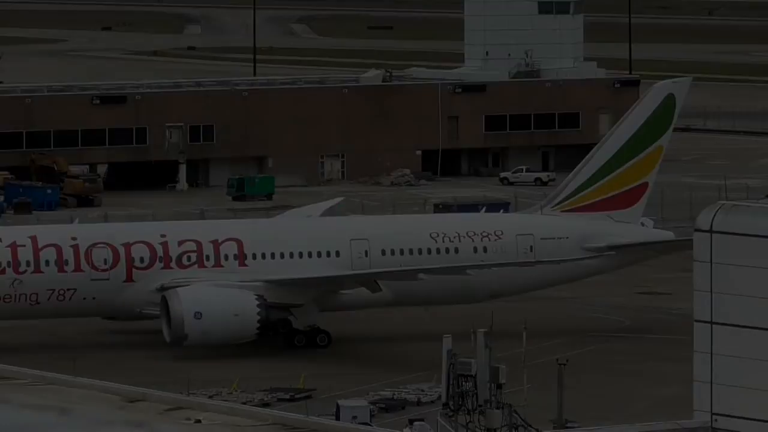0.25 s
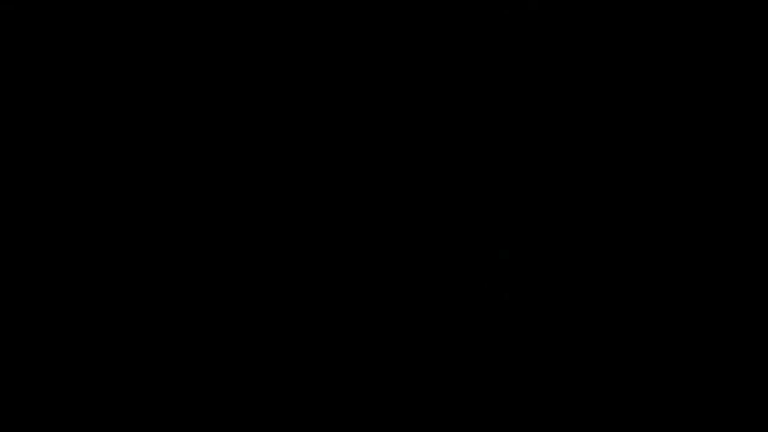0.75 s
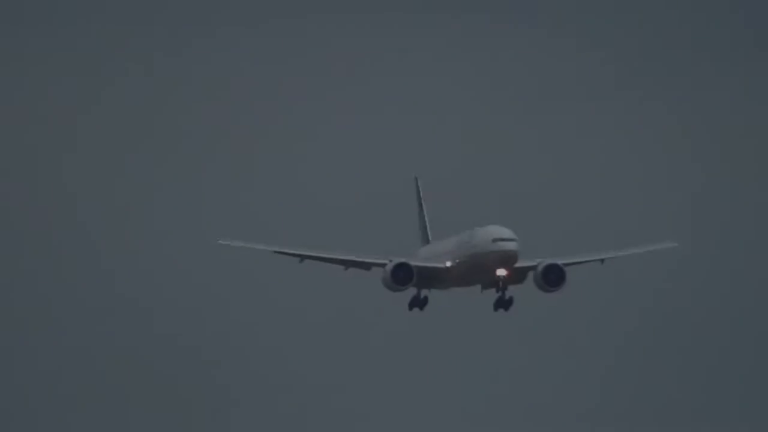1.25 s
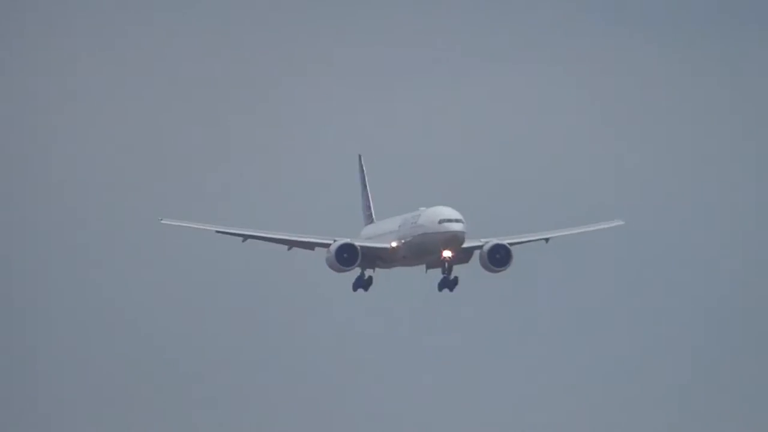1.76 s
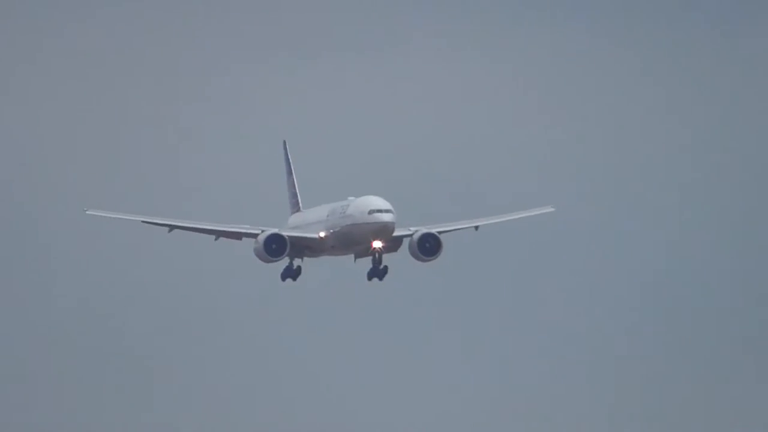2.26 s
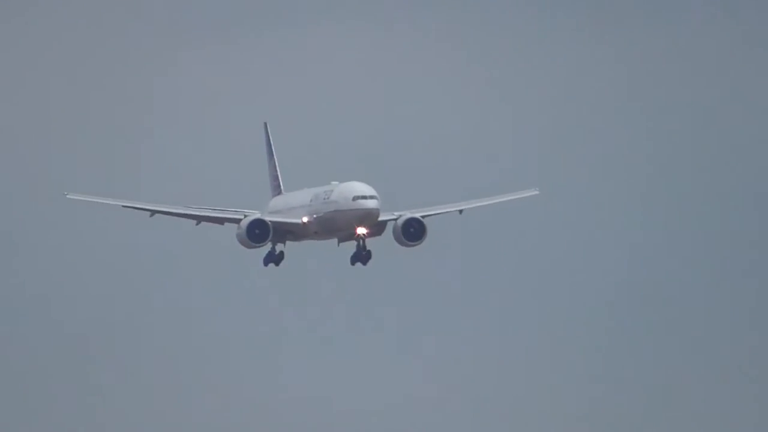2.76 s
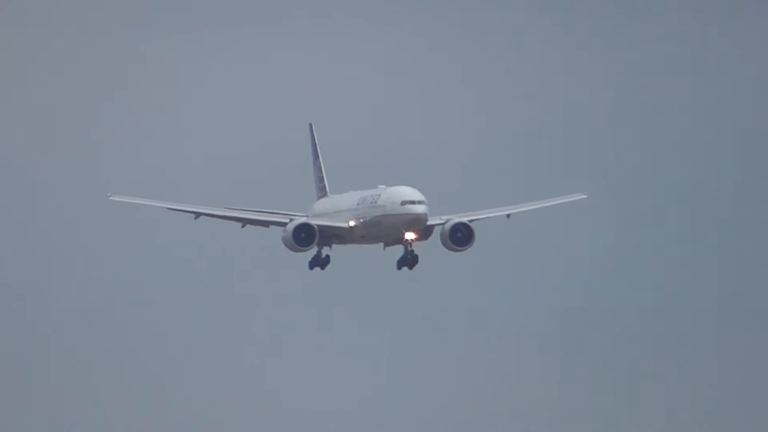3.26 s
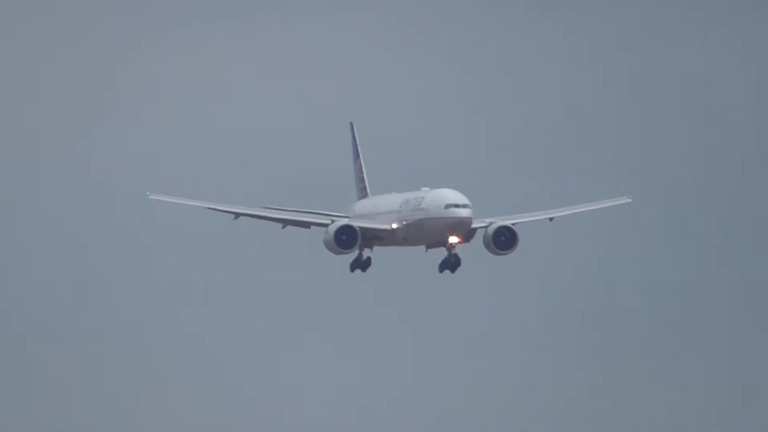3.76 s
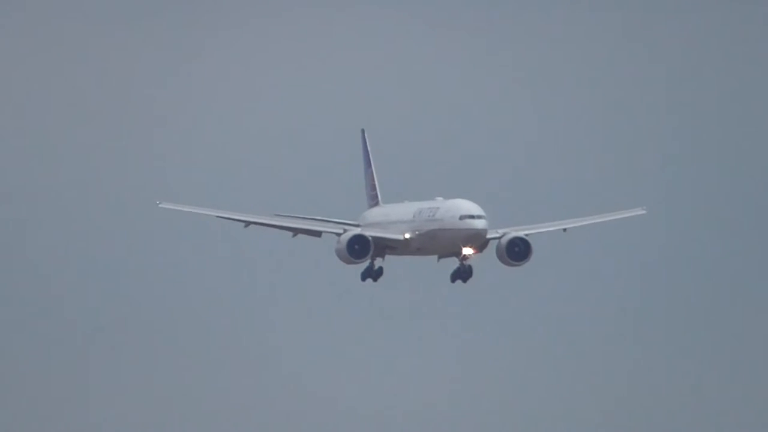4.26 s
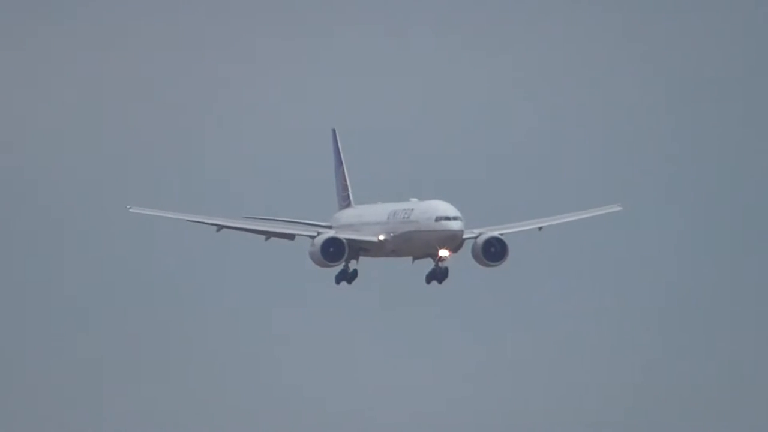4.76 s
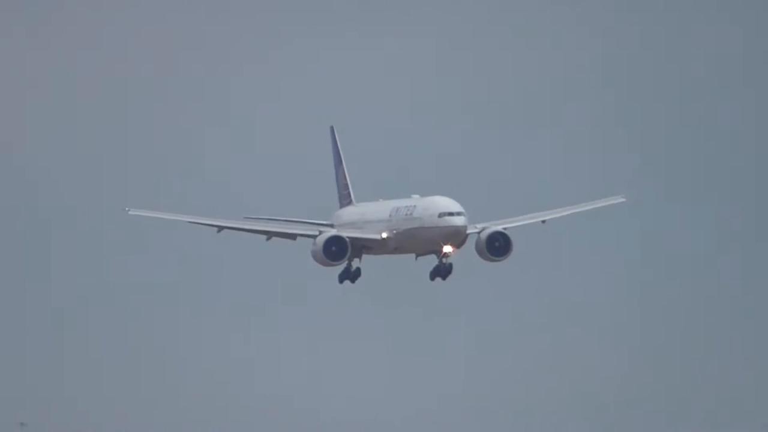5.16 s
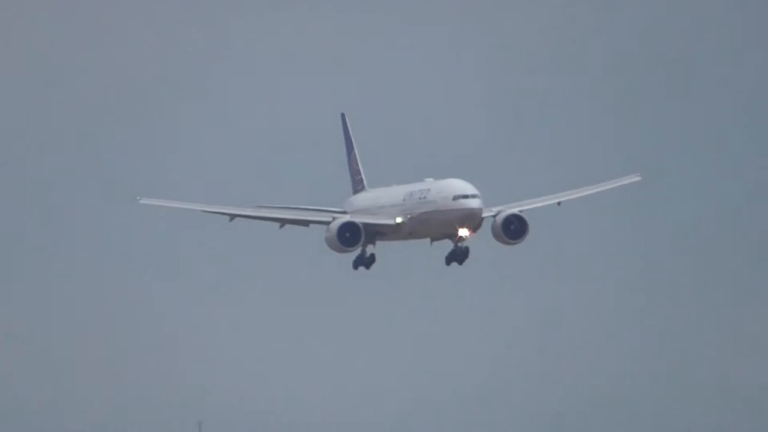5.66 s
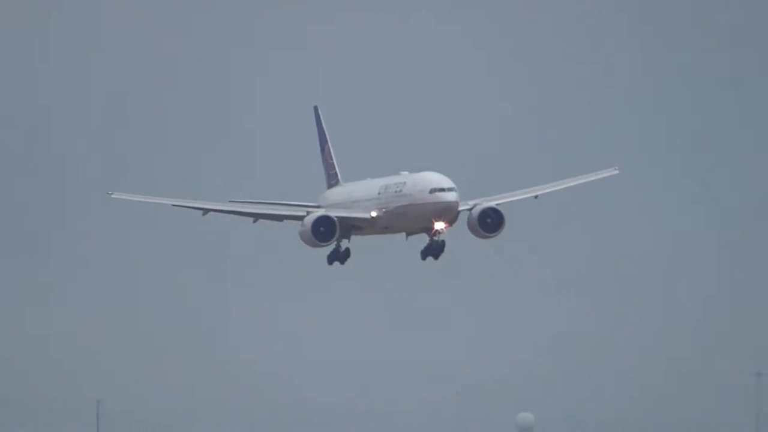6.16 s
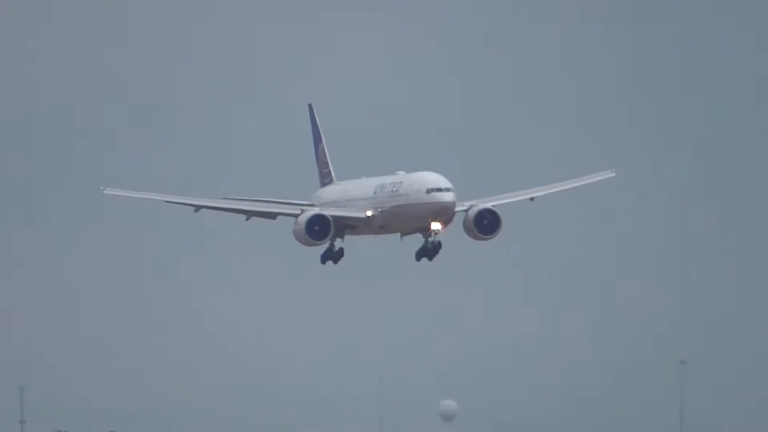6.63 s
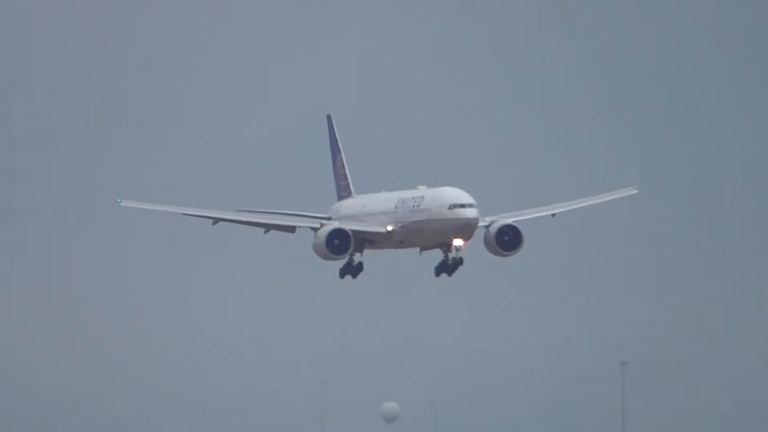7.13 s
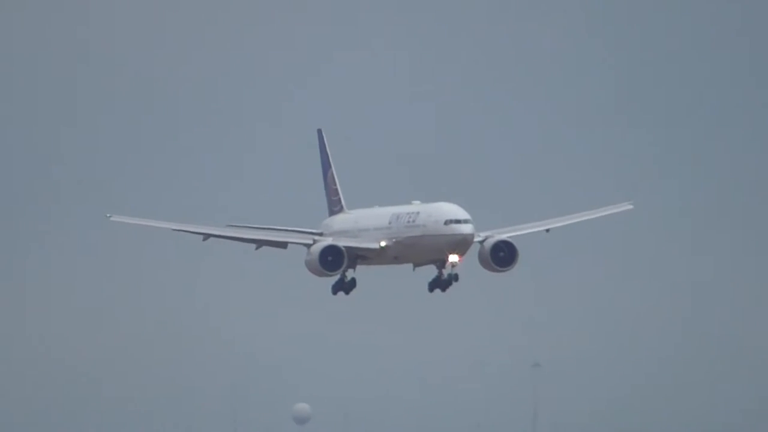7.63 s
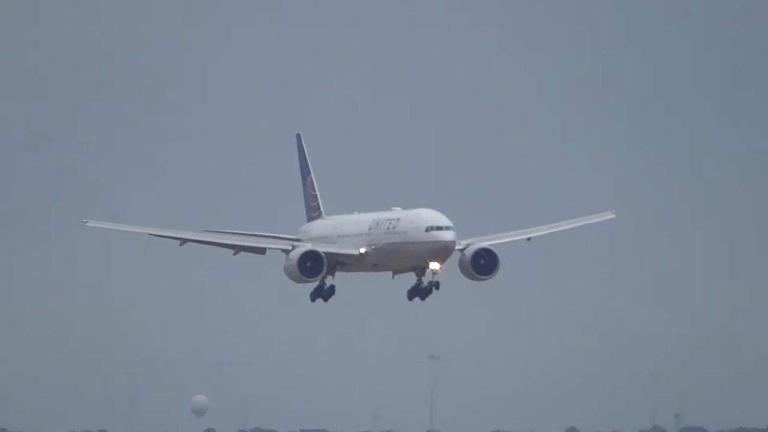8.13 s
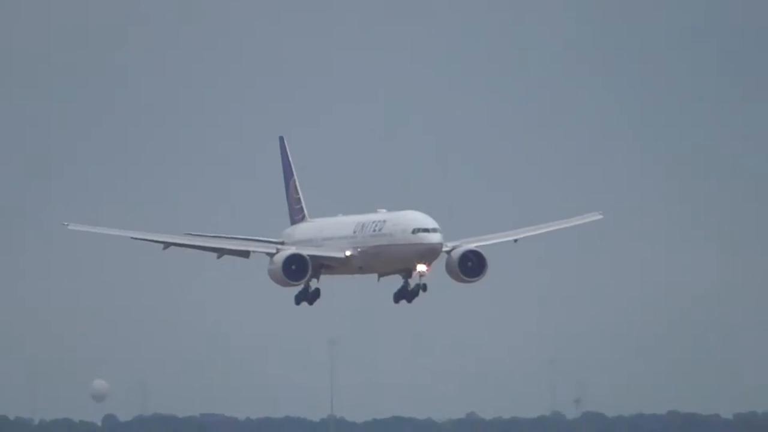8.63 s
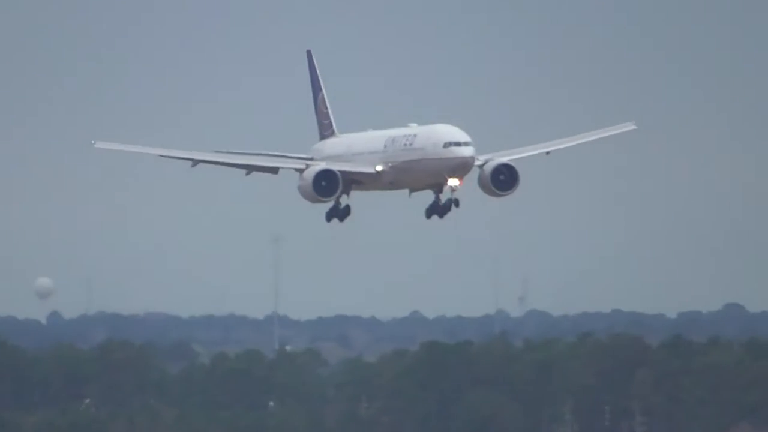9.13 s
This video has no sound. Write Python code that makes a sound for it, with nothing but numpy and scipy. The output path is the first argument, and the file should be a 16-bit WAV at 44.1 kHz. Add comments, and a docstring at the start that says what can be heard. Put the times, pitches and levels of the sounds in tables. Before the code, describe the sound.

At 0 s a faint, dull murmur of distant apron machines is already fading, reaching near silence by about 0.6 s, with one barely audible soft bump. From 0.7 to 1.7 s an approaching airliner fades in smoothly: broad jet roar, deep rolling rumble and soft hiss. A wavering fan drone near 950 Hz flares and dips, strongest around 2 to 4 s, above a hollow hum near 330 Hz. A thin, raspy, insect-like whine near 8.7 kHz holds its pitch, swelling around 2 to 4 s, with faint steady far-off tones. The roar eases slowly. Around 6.5 s the throttles close, the fan tone slides down by over 100 Hz and the hum dies away, while low booms surge until 7.4 s. From 8 s, wind gusts buffet the stereo microphone, with dull thumps near 8.1, 8.5 and 8.9 s and a faint high whistle near the end. The rumble continues to the cut at about 9.4 s.

```python
"""Beside an airport apron, heard through two microphone ports: a distant murmur fades to silence, then
an airliner on final approach fades in. Coloured noise makes its jet and airframe roar, and scattered
tones make its fans, which sink as the throttles close, its booms and a hollow airframe hum.
A thin high whine holds its pitch, faint tones lie far off, and late gusts buffet the microphone."""
import sys
import numpy as np
from scipy import signal
from scipy.fft import rfft, irfft, next_fast_len
from scipy.io import wavfile
from scipy.ndimage import uniform_filter1d

SR = 44100
rng = np.random.default_rng(int(sys.argv[2]) if len(sys.argv) > 2 else 0)


def master(y):
    """Save y as 16-bit WAV."""
    cut = np.clip(np.atleast_2d(y).T, -1, 1)
    pcm = np.round(cut * 32767)  # scale
    wavfile.write(sys.argv[1], SR, pcm.astype(np.int16))


N = 414099
TIME = np.arange(N) / SR  # s
SIZE = next_fast_len(N)
BIN_HZ = np.arange(SIZE // 2 + 1) * SR / SIZE
FREQ = np.maximum(BIN_HZ, 1)  # kept above zero for logarithms


def undb(db):
    """Decibels to gain."""
    return 10 ** (np.asarray(db) / 20)


def unit(x):
    """Scale to rms 1."""
    return x / np.sqrt(np.mean(np.abs(x) ** 2))


def curves(table):
    """Each column of a (s, ..) table at every sample."""
    s, *columns = np.transpose(table)
    return [np.interp(TIME, s, c) for c in columns]


def over_hz(table):
    """Each column of a (Hz, ..) table at every frequency, straight over log frequency."""
    hz, *columns = np.transpose(table)
    return [np.interp(np.log(FREQ), np.log(hz), c) for c in columns]


def colour_gain(colour):
    """Gain of a (Hz, dB) colour, falling steeply past its last point."""
    return undb(over_hz(colour)[0]) * np.minimum(colour[-1][0] / FREQ, 1) ** 2


def swells(table):
    """Bell-shaped changes of level from (peak s, half-length s, dB, ..) rows, one curve per dB column."""
    return sum(np.outer(dbs, np.exp(-((TIME - s) / half_s) ** 2)) for s, half_s, *dbs in table)


def walk(rate_hz):
    """Smooth random wander of spread 1: noise with its quicker changes removed."""
    smoothing = np.exp(-(BIN_HZ / rate_hz) ** 2)
    return unit(irfft(rfft(rng.standard_normal(SIZE)) * smoothing)[:N])


def pair(x, pan_db):
    """Place a sound between left and right, the left port louder by pan_db."""
    return x * undb(np.array([[pan_db], [-pan_db]]) / 2)


# How the two microphone ports hear turbulence.
# Each row: frequency in Hz, likeness from 0 to 1, lead of the left port in rad, left minus right in dB.
PORTS = [(60, 0.68, .05, -4.5), (130, 0.89, 0.22, -2.5), (290, 0.76, 0.21, -0.5), (680, 0.7, 0.46, 2.5),
         (1410, 0.41, 0.54, 2.5), (2500, 0.12, 1.1, -0.5), (3200, 0.2, 3.7, -2), (4400, 0.6, 4.4, -4),
         (6600, 0.6, 4.63, -5.5), (8100, 0.25, 11.2, -2), (15000, 1, 9.6, 0)]


def air_noise(colour, band_hz=(20, 16000)):
    """Turbulence noise, partly shared by the ports; their mean has rms 1 inside the band."""
    alike, lead, pan_db = over_hz(PORTS)
    alike = np.clip(alike, 0, 1)
    shared, *own = rfft(rng.standard_normal((3, SIZE)))
    turn = np.array([np.exp(1j * lead), np.ones(len(lead))])
    ports = np.sqrt(alike) * shared * turn + np.sqrt(1 - alike) * np.array(own)
    ports = ports * colour_gain(colour) * undb(np.array([[1], [-1]]) / 2 * pan_db)
    inside = irfft(ports.mean(axis=0) * (FREQ > band_hz[0]) * (FREQ < band_hz[1]))
    return irfft(ports)[:, :N] / inside.std()


def scatter(width_hz, steady):
    """Wandering strength and phase that spread a tone over a width; a steady tone fades less."""
    offset_hz = ((np.arange(SIZE) + SIZE // 2) % SIZE - SIZE // 2) * SR / SIZE
    chance = rng.standard_normal(SIZE) + 1j * rng.standard_normal(SIZE)
    z = np.fft.ifft(chance / (1 + 2 * (offset_hz / width_hz) ** 2))[:N]
    strength = np.sqrt(uniform_filter1d(np.abs(z) ** 2, int(SR / width_hz)))
    return unit(z / strength ** np.clip(steady, 0, 1))


def tone(hz, width_hz, alike, lead, steady=0):
    """A scattered tone at both ports, about rms 1; the left one leads by a phase angle in rad."""
    alike = np.clip(alike, 0, 1)
    shared, *own = (scatter(width_hz, steady) for _ in range(3))
    z = np.sqrt(alike) * shared + np.sqrt(1 - alike) * np.array(own)
    phase = 2 * np.pi * np.cumsum(hz * np.ones(N)) / SR
    return np.sqrt(2) * np.real(z * np.exp(1j * np.array([phase + lead, phase])))


# Colour of the murmur across the apron. Each row: frequency in Hz, relative density in dB per Hz.
APRON = [(25, -20), (80, -6), (120, -1), (165, 3), (205, 0), (250, 1), (400, -6.5), (600, -8.5),
         (780, -7.5), (1200, -12.5), (1700, -23.5), (2500, -33), (6000, -44), (14000, -62)]
APRON_DB = -48.5  # as it starts to fade
FADE_DB_PER_S = 57.5  # for the apron's fade-out and the approach's fade-in
BUMP_S, BUMP_HALF_S, BUMP_HZ, BUMP_DB = .675, .011, 200, -74  # a soft low bump in the hush


def apron():
    """Distant idling machines blend into a dull murmur that fades away; one soft bump follows."""
    bump = tone(BUMP_HZ, width_hz=130, alike=.3, lead=0, steady=.8) * undb(BUMP_DB)
    bump = bump * np.exp(-((TIME - BUMP_S) / BUMP_HALF_S) ** 2)
    return air_noise(APRON) * undb(APRON_DB - FADE_DB_PER_S * TIME) + bump


# Faint steady tones far off. Each row: pitch in Hz, level in dB before swells and panning.
THIN_TONES = [(3945, -68.3), (4734, -70.3)]
# Their flares and dips. Each row: peak in seconds, half-length in seconds, change in dB.
THIN_SWELLS = [(2.48, .09, 4), (2.95, .12, 2), (3.84, 0.065, 9), (6.5, 1.2, -5)]
# A faint whistle near the end. Each row: time in seconds, pitch in Hz, level in dB.
WHISTLE = [(8.5, 9200, -100), (8.68, 9320, -66), (8.85, 9300, -62), (9.1, 9450, -71), (9.39, 9400, -62)]


def thin_tones():
    """Faint far-off tones, slightly scattered, flare up now and then; one short whistle glides."""
    swell_db, = swells(THIN_SWELLS)
    steady = sum(undb(db + swell_db) * tone(hz, width_hz=16, alike=0.54, lead=-1.3, steady=0.63)
                 for hz, db in THIN_TONES)
    hz, db = curves(WHISTLE)
    whistle = tone(hz, width_hz=40, alike=1.0, lead=0) * undb(db)
    return pair(steady, pan_db=10.5) + whistle


# Core and shoulders of the high whine. Each row: offset in Hz, width in Hz, relative level in dB.
WHINE_PEAKS = [(0, 22, -5), (-8.5, 132, -5.5)]
# The band of hiss around it. Each row: frequency in Hz, relative density in dB per Hz.
WHINE_SKIRT = [(6000, -41), (6950, -13), (7350, -19), (7600, -5), (8100, -9), (8300, 1), (8800, 2),
               (9100, -11.5), (9650, -9.5), (9900, -14), (11000, -26), (13000, -46)]
# Its swells. Each row: peak in seconds, half-length in seconds, change in dB.
WHINE_SWELLS = [(1.7, 0.4, 7.5), (2.36, 0.17, 8.5), (2.68, 0.1, 6), (2.96, 0.1, 7.5), (3.8, 0.54, 8.5),
                (3.86, .035, 4), (4.14, 0.017, 6), (4.3, .04, 3), (6.52, 0.019, 8), (8.3, 1.5, 5.5)]
WHINE_HZ, WHINE_DB, WHINE_SKIRT_DB = 8677, -48, -54  # levels between swells
WHINE_CENTRES_S = 2.78


def whine(shimmer_db=1.53, rough_db=0.9, turn_s=0.15, wide_rad=3.2, skirt_swell=0.58):
    """Perhaps insects in the grass: a shimmering, raspy line in hiss, wide at first, then centred."""
    lead = wide_rad * np.clip((WHINE_CENTRES_S - TIME) / turn_s + .5, 0, 1)
    swell_db, = swells(WHINE_SWELLS)
    peaks = sum(undb(db) * tone(WHINE_HZ + offset_hz, width_hz, alike=0.99, lead=lead, steady=0.7)
                for offset_hz, width_hz, db in WHINE_PEAKS)
    peaks = peaks * undb(WHINE_DB + swell_db + shimmer_db * walk(28))
    hiss = irfft(rfft(rng.standard_normal(SIZE)) * colour_gain(WHINE_SKIRT))
    hiss = unit(signal.hilbert(hiss)[:N])  # complex, so that its phase can be turned
    skirt = np.sqrt(2) * np.real([hiss * np.exp(1j * lead), hiss])
    skirt = skirt * undb(WHINE_SKIRT_DB + skirt_swell * swell_db)
    return pair((peaks + skirt) * undb(rough_db * walk(28)), pan_db=1.5)


# Gusts on the microphone. Each row: start in seconds, decay in seconds, level in dB before rise and decay.
GUSTS = [(7.98, 0.098, -21), (8.23, 0.25, -32), (8.488, 0.081, -18.5), (8.63, .05, -20), (8.68, 0.02, -22),
         (8.89, 0.054, -21), (8.95, 0.07, -19), (9.22, 0.04, -18)]
# Colour of the buffeting. Each row: frequency in Hz, relative density in dB per Hz.
BUFFET = [(20, -18), (45, -9), (80, 7), (120, 5), (240, 2.5), (310, -8), (500, -27), (1000, -38),
          (2500, -71)]


def gusts(rise_s=0.0033, own_db=-10):
    """Each eddy hits quickly and dies away, pushing the ports in opposite directions, the right harder."""
    push = 0
    for s, decay_s, db in GUSTS:
        age = np.maximum(TIME - s, 0)
        push = push + undb(db) * (1 - np.exp(-age / rise_s)) * np.exp(-age / decay_s)
    eddy, *own = unit(irfft(rfft(rng.standard_normal((3, SIZE))) * colour_gain(BUFFET))[:, :N])
    buffeting = eddy * np.array([[1], [-1]]) + undb(own_db) * np.array(own)
    return pair(push * buffeting, pan_db=-3.0)


# The hardest eddies thump the microphone housing.
# Each row: start in seconds, pitch in Hz, level in dB at the top of the knock.
THUMPS = [(8.06, 150, -16), (8.498, 200, -15), (8.52, 242, -6), (8.905, 165, -16)]
THUMP_RISE_S = 0.005


def thumps():
    """A hard eddy gives a dull knock of a few cycles, pushing the two ports in opposite directions."""
    knocks = 0
    for s, hz, db in THUMPS:
        age = np.maximum(TIME - s, 0)
        swell = age / THUMP_RISE_S * np.exp(1 - age / THUMP_RISE_S)
        knocks = knocks + undb(db) * swell ** 2 * np.sin(2 * np.pi * hz * age)
    return pair(knocks * np.array([[-1], [1]]), pan_db=-2.5)


# The hum wavers. Each row: peak in seconds, half-length in seconds, change in dB.
HUM_SWELLS = [(1.2, 0.67, -22), (2.33, 0.083, -0.5), (2.62, .1, -14), (3.13, 0.13, -6.5), (3.8, .22, 4),
              (4.08, 0.082, -9), (5.45, .25, 4), (6.35, 0.079, -2), (6.9, 0.14, 3.5)]
HUM_HZ, HUM_DB = 332.8, -31.5  # level at the knee, between swells
HUM_KNEE_S, HUM_EARLY_FALL_DB_PER_S, HUM_LATE_FALL_DB_PER_S = 4.3, 0.5, 1
HUM_HOLD_S, HUM_RELEASE_DB_PER_S2 = 6.58, 13  # then it dies away ever faster


def airframe_hum(breadth_db=-7, wander_hz=1.89, waver_db=1.35, lead=.09):
    """A cavity hums in the slipstream, a fine line with a blurred one; its pitch ignores the throttles."""
    age = TIME - HUM_KNEE_S
    trend_db = np.minimum(-HUM_EARLY_FALL_DB_PER_S * age, -HUM_LATE_FALL_DB_PER_S * age)
    release_db = HUM_RELEASE_DB_PER_S2 * np.maximum(TIME - HUM_HOLD_S, 0) ** 2
    swell_db, = swells(HUM_SWELLS)
    phase = 2 * np.pi * np.cumsum(HUM_HZ + wander_hz * walk(4.07)) / SR
    core = np.sqrt(2) * np.cos([phase + lead, phase]) * undb(waver_db * walk(6.5))
    breadth = undb(breadth_db) * tone(HUM_HZ, width_hz=23, alike=0.92, lead=lead, steady=1.0)
    return (core + breadth) * undb(HUM_DB + trend_db - release_db + swell_db)


# Booming surges in the late rumble.
# Each row: peak in seconds, half-length in seconds, pitch in Hz, level in dB at the peak.
BOOMS = [(6.696, 0.082, 212, -26), (6.83, 0.063, 170.7, -25), (6.95, 0.14, 255, -30.5),
         (7.224, 0.067, 250, -26), (7.373, 0.06, 212, -35), (8.318, 0.12, 206, -27),
         (8.64, 0.04, 225, -29.5), (9.294, 0.17, 340, -34)]


def booms():
    """Narrow bands of the rumble well up and sink again, each at its own pitch."""
    return sum(tone(hz, width_hz=28, alike=0.83, lead=.2, steady=0.52)
               * undb(db) * np.exp(-((TIME - s) / half_s) ** 2)
               for s, half_s, hz, db in BOOMS)


# Colours of the approaching jet, from the lowest exhaust noise through deep rumble, rumble and roar
# to hiss. Each row: frequency in Hz, relative density in dB per Hz.
SUB = [(15, -13), (28, -6.5), (42, 27.5), (52, 28.5), (75, -55)]
DEEP = [(20, -39), (43, -22), (56, -6.5), (66, 1), (88, 4), (105, 1), (125, -6), (220, -43)]
RUMBLE = [(60, -30.5), (100, -2.5), (125, -1.5), (165, 3), (210, 3.5), (270, 1.5), (330, -3), (450, -26),
          (700, -79)]
ROAR = [(180, -26), (300, 1), (380, 2), (560, 1), (720, -3), (900, -2.5), (1100, -6.5), (1400, -10.5),
        (1750, -19.5), (2100, -21.5), (2700, -43.5), (4000, -52)]
HISS = [(1300, -14), (2200, 9), (2800, 4.5), (3800, 5.5), (4400, -1), (4900, 0), (6000, -7.5), (7500, -6),
        (9600, -17), (11000, -20), (12500, -22), (14500, -26), (16000, -27)]
# Engine power as heard on the ground. Each row: time in seconds, power in dB below its peak.
POWER = [(1.7, -2.5), (2.85, 0), (3.4, -0.7), (4.8, -2.5), (6.2, -5), (6.75, -3.5), (7.9, -4), (9.39, -5)]
# The rumble rolls in swells.
# Each row: peak in seconds, half-length in seconds, change of deep rumble in dB, of rumble in dB.
RUMBLE_SWELLS = [(1.6, 0.33, -1.5, -2.5), (4.0, 0.55, 1, 1.5), (6.88, 0.21, 7, 3), (7.9, 0.32, 4, 0.5),
                 (8.27, 0.26, 2, 3.5), (8.77, 0.28, 9, 0.5)]
ROAR_DB, HISS_DB, SUB_DB = -29, -51, -45  # at peak power
HISS_DB_PER_DB, SUB_DB_PER_DB = 0.6, 1.5  # how strongly they follow the power
DEEP_DB, RUMBLE_DB = -37, -29.5  # between swells


def jet(flutter_db=0.5, own_db=0.5):
    """Jet and airframe noise follow the power or roll in swells; moving air makes most of it flutter."""
    power_db, = curves(POWER)
    deep_db, rumble_db = swells(RUMBLE_SWELLS)
    # colour, band in Hz that sets its level, level in dB
    regions = [
        (DEEP, (55, 105), DEEP_DB + deep_db),
        (RUMBLE, (115, 290), RUMBLE_DB + rumble_db),
        (ROAR, (380, 800), ROAR_DB + power_db),
        (HISS, (2200, 6000), HISS_DB + HISS_DB_PER_DB * power_db),
    ]
    flutter = flutter_db * walk(11)  # common to the four regions
    noise = sum(air_noise(colour, band_hz) * undb(db + flutter + own_db * walk(24))
                for colour, band_hz, db in regions)
    return noise + air_noise(SUB) * undb(SUB_DB + SUB_DB_PER_DB * power_db)


# The blade tone swells and dips in the moving air.
# Each row: peak in seconds, half-length in seconds, change in dB.
FAN_SWELLS = [(1.25, 0.46, -2.5), (1.735, 0.048, 9), (1.9, 0.032, 10), (2.14, 0.014, 10), (2.22, 0.014, 0),
              (2.32, 0.033, 7.5), (2.39, 0.012, 6.5), (2.48, 0.018, 3), (2.55, 0.46, 7), (2.83, 0.031, 6),
              (2.9, 0.01, 6), (3.01, 0.013, 9.5), (3.11, 0.026, 6), (3.5, 0.18, -3), (3.84, 0.035, 11.5),
              (5.1, 0.046, 3.5), (5.93, 0.15, 4), (6.8, 0.14, 10), (8.07, 0.07, 4.5)]
FAN_HZ, FAN_SAG_HZ_PER_S = 957, 4.8  # a slow sag in pitch
OPEN_S, OPEN_SPOOL_S, OPEN_RISE_HZ = 1.6, .06, 20  # a nudge of throttle lifts it to that line
THROTTLE_S, SPOOL_S, SPOOL_DROP_HZ = 6.52, .28, 108.4  # the throttles close and the fans run down
FAN_DB, FAN_KNEE_S = -33.5, 2.36  # reference level of the blade tone at the knee, between swells
FAN_EARLY_FALL_DB_PER_S, FAN_LATE_FALL_DB_PER_S = 0.5, 2.5  # faster as the engines turn away
OCTAVE_DB, OCTAVE_SLOPE_DB_PER_S, OCTAVE_IDLE_DB = -51, 1.95, 6  # at the knee, around it, change at idle
TURBINE_RATIO, TURBINE_DB = 5.5, -73  # a faint turbine whistle, geared to the blade tone


def fans(skirt_db=-6, core_db=-1, skirt_swell=0.72, intake_db=-9, intake_fall_db_per_s=9.0,
         flutter_db=2.0, idle_core_db=-6, wander_hz=3):
    """Blade tone, octave and turbine whistle sink as the fans run down; intake hiss dies away early."""
    idle = .5 + .5 * np.tanh((TIME - THROTTLE_S) / (2 * SPOOL_S))  # 0 to 1
    early = .5 - .5 * np.tanh((TIME - OPEN_S) / (2 * OPEN_SPOOL_S))  # 1 to 0
    hz = FAN_HZ - FAN_SAG_HZ_PER_S * TIME - SPOOL_DROP_HZ * idle - OPEN_RISE_HZ * early
    hz = hz + wander_hz * walk(5.98)
    age = TIME - FAN_KNEE_S
    blade_db = FAN_DB + np.minimum(-FAN_EARLY_FALL_DB_PER_S * age, -FAN_LATE_FALL_DB_PER_S * age)
    octave_db = OCTAVE_DB - OCTAVE_SLOPE_DB_PER_S * np.abs(age) + OCTAVE_IDLE_DB * idle
    octave_db = octave_db + flutter_db * walk(11)
    swell_db, = swells(FAN_SWELLS)

    # the core weakens at idle, which leaves the blade tone more blurred
    core = undb(core_db + swell_db + idle_core_db * idle + flutter_db * walk(42))
    core = core * tone(hz, width_hz=16.4, alike=0.97, lead=1.0, steady=0.95)
    skirt = undb(skirt_db + skirt_swell * swell_db)
    skirt = skirt * tone(hz, width_hz=77, alike=0.99, lead=1.0, steady=0.94)
    intake = undb(intake_db - intake_fall_db_per_s * TIME)
    intake = intake * tone(hz=2150, width_hz=380, alike=.7, lead=0.77)
    octave = undb(octave_db) * tone(2 * hz, width_hz=57, alike=0.44, lead=0.59)
    turbine = undb(TURBINE_DB) * tone(TURBINE_RATIO * hz, width_hz=30, alike=.8, lead=0)
    blade = (core + skirt + intake) * undb(blade_db)
    return pair(blade, pan_db=5.5) + pair(octave, pan_db=9.0) + turbine


CHANGE_S, FADED_IN_S = 0.66, 1.686  # the approach starts from silence, and is fully in


def scene():
    """The apron fades to silence, then the approach fades in."""
    surroundings = thin_tones() + whine() + gusts() + thumps()
    airliner = airframe_hum() + booms() + jet() + fans()
    fade_in = undb(FADE_DB_PER_S * np.minimum(TIME - FADED_IN_S, 0))
    floor = undb(FADE_DB_PER_S * (CHANGE_S - FADED_IN_S))  # taken off so that it starts at zero
    return apron() + (surroundings + airliner) * np.maximum(fade_in - floor, 0)


TOP_HZ = 15700


def record(dry):
    """The recorder cuts the top with a steep low-pass."""
    return signal.sosfilt(signal.ellip(12, .2, 80, TOP_HZ, fs=SR, output="sos"), dry)


dry = scene()
out = record(dry)
master(out)
```